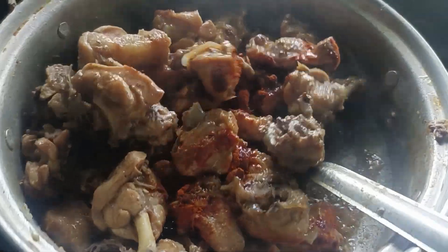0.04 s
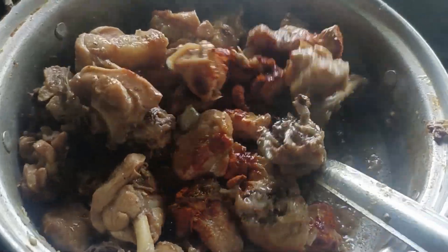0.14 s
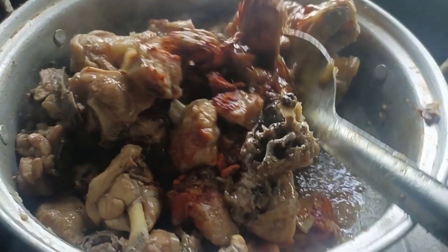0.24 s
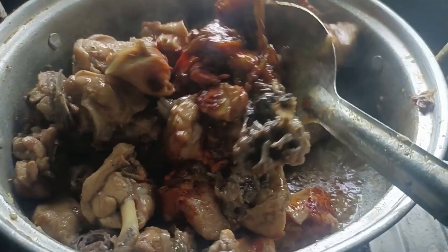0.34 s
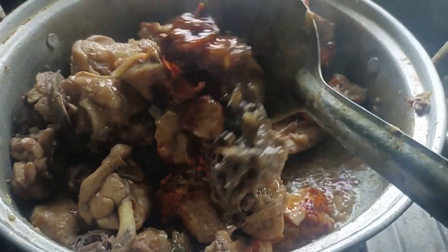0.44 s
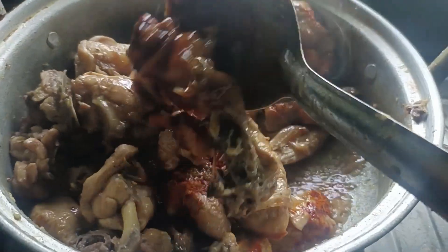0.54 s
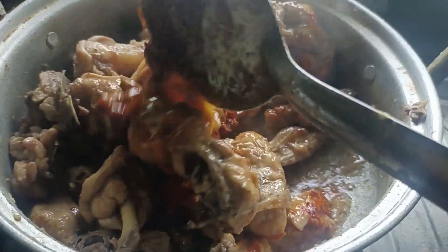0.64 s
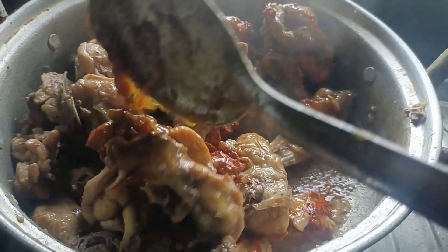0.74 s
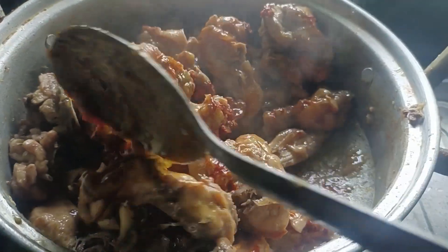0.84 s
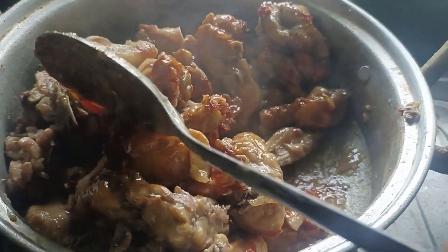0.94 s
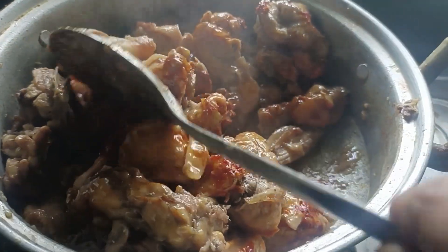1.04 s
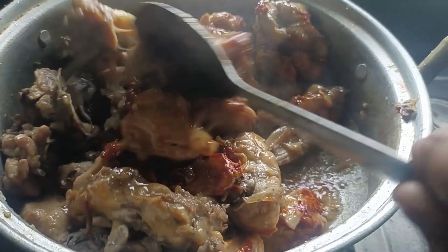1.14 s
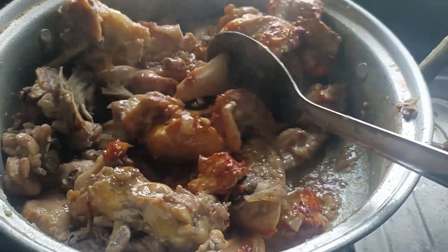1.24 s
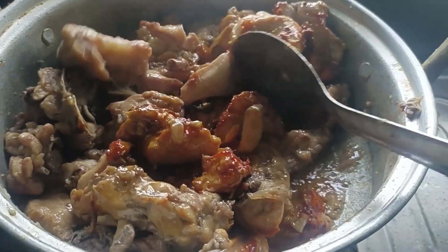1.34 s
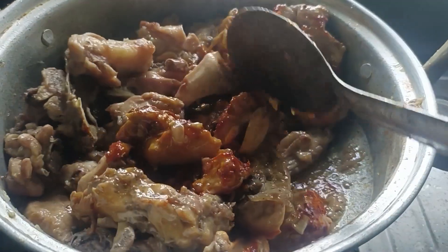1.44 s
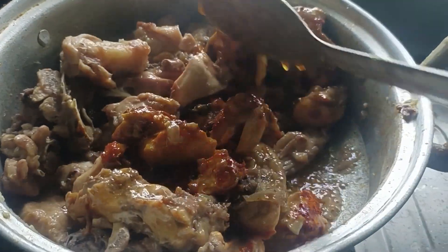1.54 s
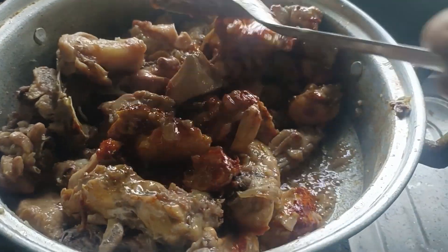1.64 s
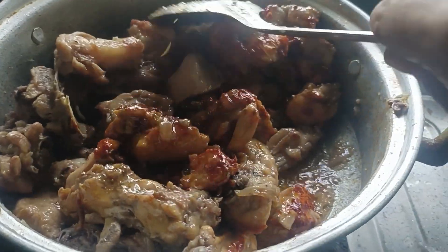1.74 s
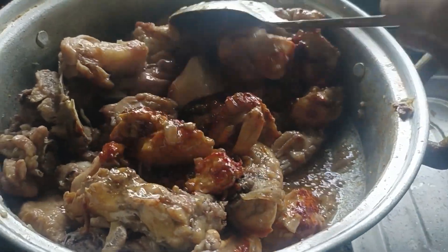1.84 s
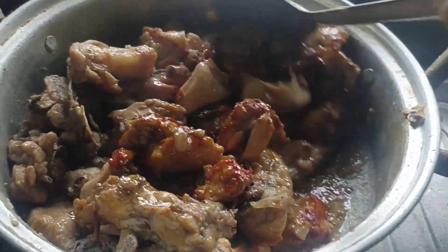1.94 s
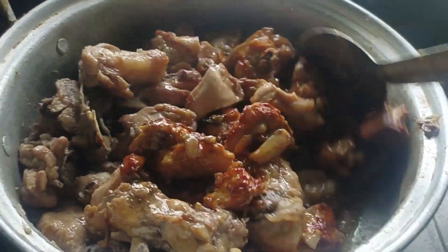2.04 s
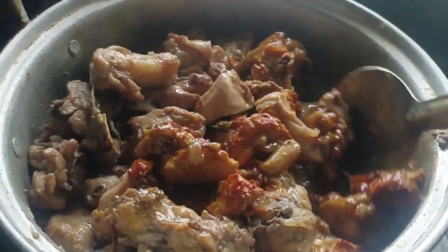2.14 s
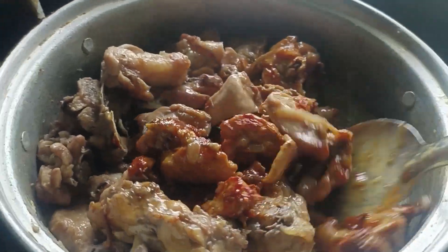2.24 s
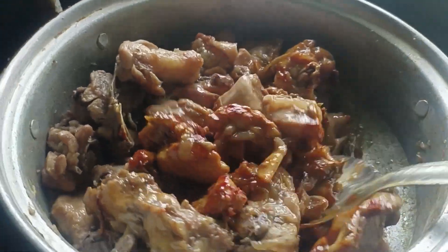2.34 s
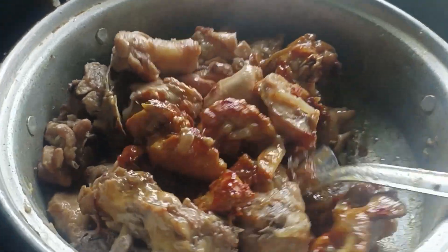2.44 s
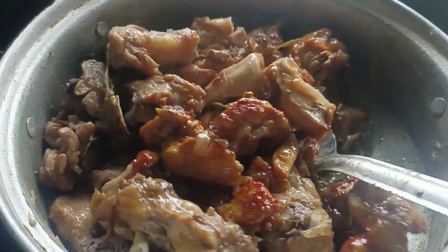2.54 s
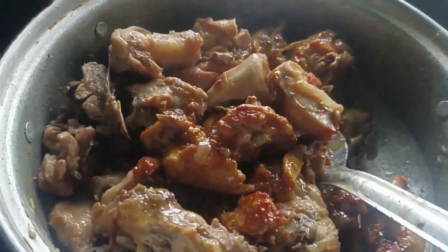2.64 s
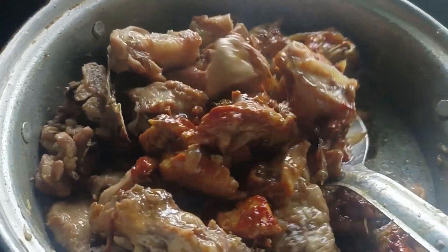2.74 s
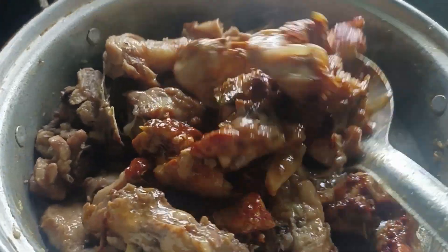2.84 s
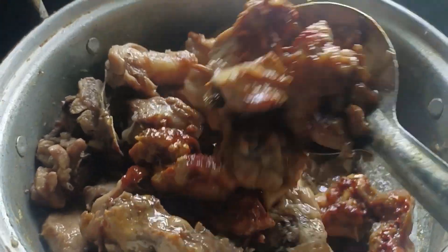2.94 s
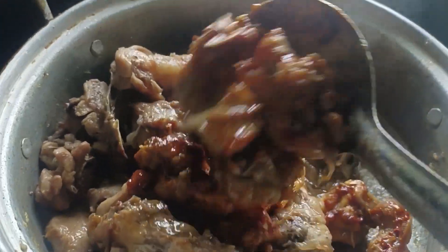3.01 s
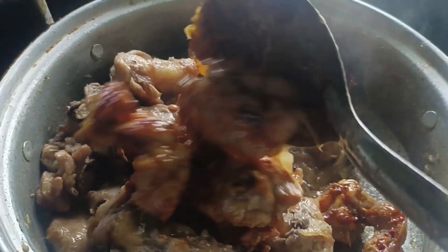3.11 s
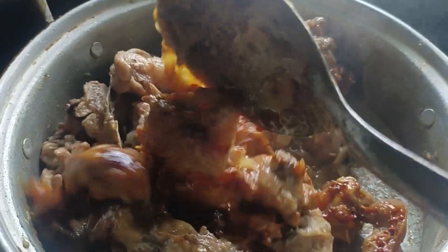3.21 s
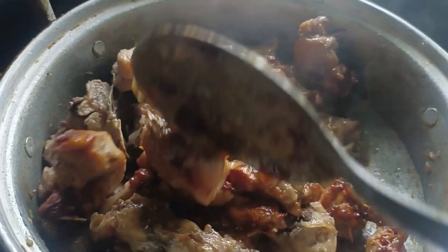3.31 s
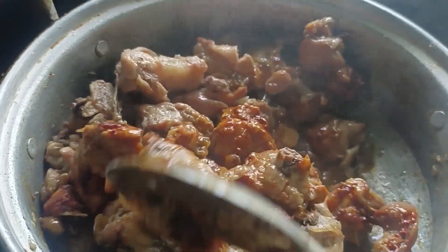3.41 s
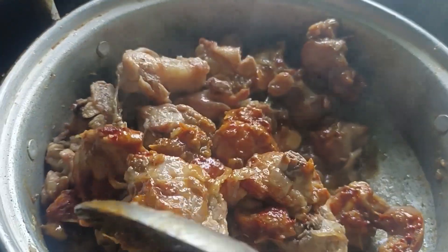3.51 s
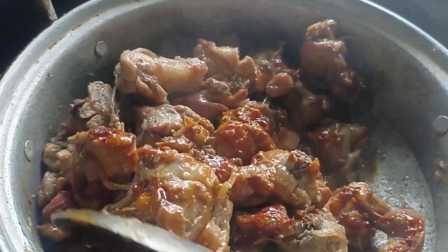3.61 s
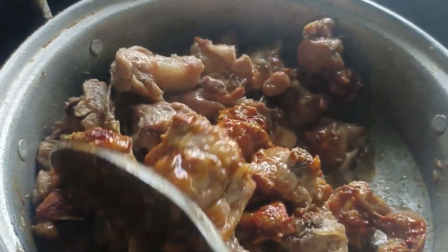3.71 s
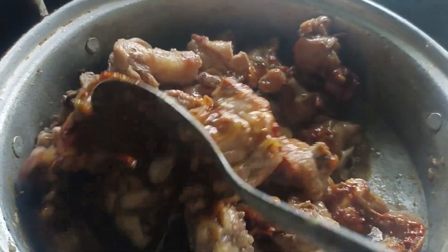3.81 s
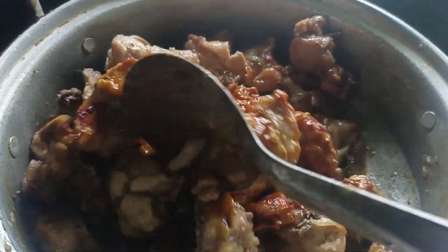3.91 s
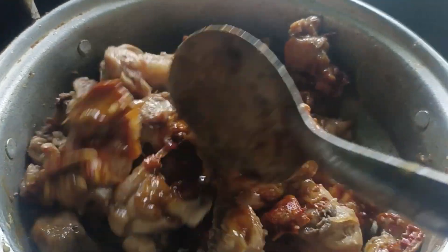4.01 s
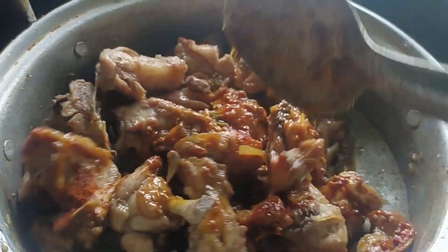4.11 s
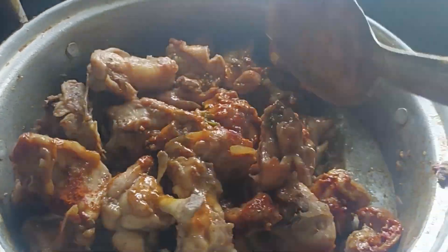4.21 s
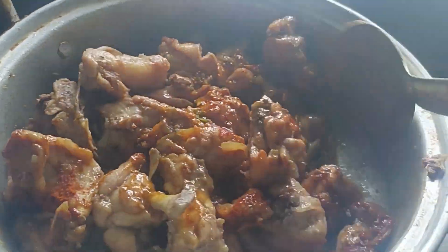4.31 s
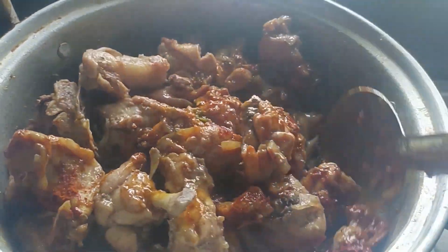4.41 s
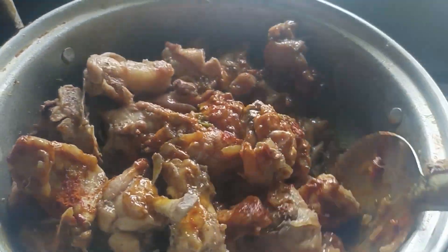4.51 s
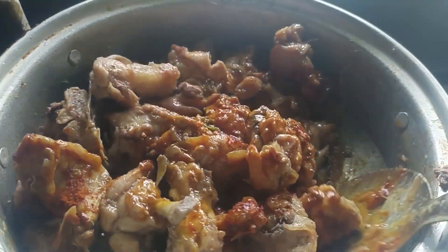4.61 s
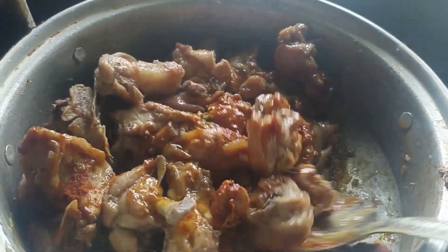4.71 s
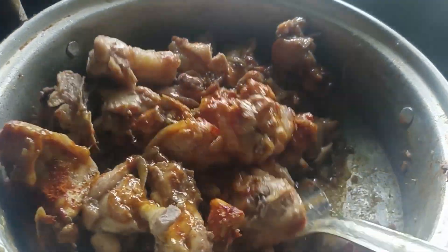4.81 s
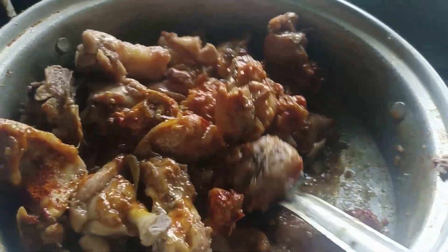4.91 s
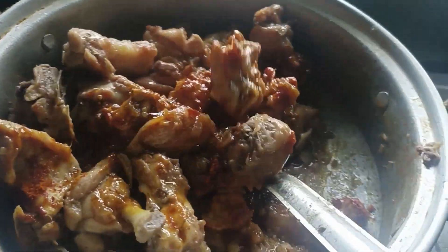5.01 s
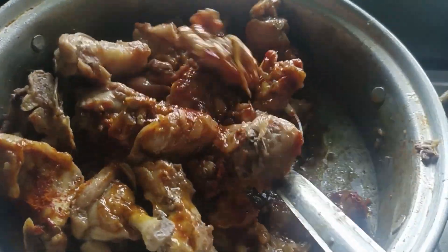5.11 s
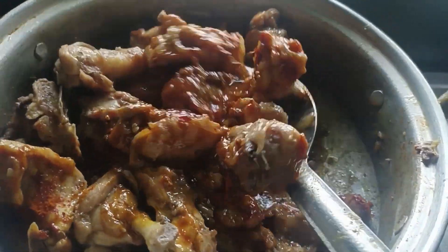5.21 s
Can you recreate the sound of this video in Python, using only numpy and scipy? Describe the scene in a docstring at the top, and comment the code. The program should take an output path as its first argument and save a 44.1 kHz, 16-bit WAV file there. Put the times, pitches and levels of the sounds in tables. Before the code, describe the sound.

Sauce sizzles softly in a wide metal pot throughout, close by in a small kitchen, over a faint low stove rumble. In the first half second a metal spoon knocks the bottom about three times with low, ringing booms, along with clinks and a short scrape. The frying then flares up, strongest around 1.5 seconds. From about 1.9 to 2.9 seconds the spoon drags along the wall with gritty scrapes, clinks, thin high squeaks and faint brief whistles, while chunks of meat tumble with soft thuds. A booming knock lands at 3 seconds, followed by mostly sizzling, which swells again near 3.9 seconds. At 4.3 seconds comes a sharp clink with a faint deep thump, then more scraping, squeaking, light clinks and dull thuds of meat. One last ringing knock on the pot comes at about 5.2 seconds.

```python
"""A small kitchen: a metal spoon turns chunks of meat in a wide metal pot on a stove.
Sauce sizzles in tiny bursts over a low rumble and flares up as wet meat meets hot metal.
Pieces tumble back with soft thuds; there is one deep handling thump, and faint whistles glide by.
The spoon's edge sticks and slips on the wall in scrapes and squeaks, clinks against it,
and knocks the pot bottom into a low boom."""
import sys
import numpy as np
from scipy import signal
from scipy.fft import rfft, irfft, next_fast_len
from scipy.io import wavfile

SR = 44100
rng = np.random.default_rng(int(sys.argv[2]) if len(sys.argv) > 2 else 0)


def pcm_store(signal):
    """Save signal as 16-bit PCM."""
    levels = np.round(np.clip(np.atleast_2d(signal), -1, 1) * 32767)
    wavfile.write(sys.argv[1], SR, levels.astype(np.int16).T)


N = 231766
T = np.arange(N) / SR
AFTER = T[:SR * 3 // 4]   # seconds since a contact


def from_db(db):
    """Decibels to gain."""
    return 10 ** (np.asarray(db) / 20)


def unit_rms(x):
    """Scale to rms 1."""
    return x / np.sqrt(np.mean(x ** 2) + 1e-20)


def at_hz(points, hz):
    """Read a table on a log-frequency axis."""
    points_hz, values = np.transpose(points)
    return np.interp(np.log(np.maximum(hz, 1)), np.log(points_hz), values)


def add(out, start_s, sound):
    """Mix a sound in at a time."""
    start = max(round(start_s * SR), 0)
    part = sound[..., :N - start]
    out[..., start:start + part.shape[-1]] += part


def colour(x, spectrum):
    """Minimum-phase filter through (Hz, dB) points."""
    length = x.shape[-1]
    size = 2 * next_fast_len(length // 2 + 4096)
    bins_hz = np.arange(size // 2 + 1) * SR / size
    cepstrum = irfft(np.log(from_db(at_hz(spectrum, bins_hz))))
    cepstrum[1:size // 2] *= 2
    cepstrum[size // 2 + 1:] = 0
    return irfft(rfft(x, size) * np.exp(rfft(cepstrum)))[..., :length]


def tilted(spectrum, db_per_octave):
    """Tilt a spectrum about 700 Hz: harder contacts are brighter."""
    return [(hz, db + db_per_octave * np.log2(hz / 700)) for hz, db in spectrum]


def resonate(x, hz, width_hz):
    """Two-pole resonance."""
    r = np.exp(-np.pi * width_hz / SR)
    return signal.lfilter([1 - r, 0, r - 1], [1, -2 * r * np.cos(2 * np.pi * hz / SR), r * r], x)


def swell(rise_s, t60_s):
    """Envelope that builds up and dies away."""
    return (1 - np.exp(-AFTER / max(rise_s, 1e-4))) * from_db(-60 * AFTER / t60_s)


def drift(rate_hz):
    """Random wander of rms 1."""
    knots = rng.standard_normal(1024)
    return unit_rms(np.interp(T * rate_hz, np.arange(len(knots)), knots))


def grains(per_s, spread_db):
    """Random impulses of uneven size, each reaching the two sides differently."""
    sizes = from_db(spread_db * np.minimum(rng.exponential(1, N), 4))
    fired = rng.random(N) < per_s / SR
    return unit_rms(fired * sizes * rng.standard_normal((2, N)))


# Stereo width. Each row: frequency in Hz, side over mid in dB.
STEREO_WIDTH = [(60, -14), (130, -13), (260, -26.5), (500, -11.5), (1000, 0), (2000, -1), (5000, 0)]

def diffuse(size):
    """Stereo noise: alike in the bass, unrelated in the treble."""
    mid, side = rng.standard_normal((2, size))
    return mid + colour(side, STEREO_WIDTH) * [[1], [-1]]


# Stove rumble. Each row: frequency in Hz, relative level in dB.
RUMBLE_SPECTRUM = [(25, -15), (55, -54), (70, -32), (82, 10.5), (110, -9), (160, -2), (230, 5), (330, -5),
                   (550, -9), (1000, -11), (2000, -29)]

def stove(level_db=-63):
    """A steady low rumble under the pot."""
    return from_db(level_db) * unit_rms(colour(diffuse(N), RUMBLE_SPECTRUM))


# Whistles and groans. Each row: start in seconds, length in seconds, first and last pitch in Hz,
# level in dB.
WHISTLE_GLIDES = [(0.978, 0.25, 780, 768, -56), (1.949, 0.096, 3020, 2780, -42.5),
                  (2.138, 0.106, 504, 395, -45), (2.404, 0.16, 708, 707, -36.5),
                  (2.655, 0.18, 737, 684, -56), (2.744, 0.0465, 4230, 3810, -47),
                  (2.792, 0.104, 1870, 1890, -50), (3.254, 0.051, 4650, 4420, -49.5),
                  (3.52, 0.053, 4180, 3640, -49.5), (5.053, 0.065, 1098, 1037, -43.5)]

def whistles(roughness=0.9, flutter_cycles=7):
    """Faint tones glide in and out, roughened by a flutter in level and phase."""
    out = np.zeros((2, N))
    for start_s, length_s, first_hz, last_hz, db in WHISTLE_GLIDES:
        size = int(length_s * SR)
        phase = 2 * np.pi * np.cumsum(np.linspace(first_hz, last_hz, size)) / SR
        flutter_hz = first_hz / flutter_cycles
        tone = np.zeros((2, size))
        for side in range(2):
            steady = (1 - roughness) * np.exp(2j * np.pi * rng.random())
            flutter = roughness * (drift(flutter_hz) + 1j * drift(flutter_hz))[:size]
            tone[side] = np.real((steady + flutter) * np.exp(1j * phase))
        add(out, start_s, from_db(db) * np.sqrt(np.hanning(size)) * unit_rms(tone))
    return out


# Meat lands wet side down. Each row: start in seconds, length in seconds, peak fizz in dB,
# midway pitch in Hz.
FRYING_FLARES = [(0.43, 1, -48.5, 3540), (1.06, 1, -42, 3610), (1.869, 0.51, -40, 3270),
                 (2.996, 0.24, -47.5, 3270), (3.62, 0.59, -44.5, 3200), (4.403, 0.84, -46.5, 3440)]

def flares(sink_octaves_per_s=0.18):
    """Power and pitch in Hz of the fizz: each flare swells and fades, sinking as its bubbles grow."""
    power, weighted_hz = np.full(N, 1e-12), np.full(N, 1e-9)
    for start_s, length_s, db, hz in FRYING_FLARES:
        progress = np.clip((T - start_s) / length_s, 0, 1)
        flare = (from_db(db) * np.sin(np.pi * progress)) ** 2
        power += flare
        weighted_hz += flare * hz * 2 ** (-sink_octaves_per_s * (T - start_s - length_s / 2))
    return power, weighted_hz / power


# Frying hiss. Each row: frequency in Hz, relative level in dB.
HISS_SPECTRUM = [(300, -36), (800, -41), (1300, -3.5), (2000, -5.5), (2800, -2), (3700, 4.5), (4700, 4),
                 (6000, 6), (7000, -3.5), (8500, -2.5), (9300, -14), (11000, -13.5), (14500, -4),
                 (16000, -11)]
# Hiss beneath the flares. Each row: time in seconds, level in dB.
HISS_FLOOR = [(0, -46.5), (0.85, -48), (1.2, -47), (1.45, -55), (1.8, -49), (2.7, -47), (3.35, -51),
              (3.95, -47), (4.27, -50), (4.6, -47), (5.26, -46.5)]
# Resonances of the pot's hollow. Each row: frequency in Hz, width in Hz, gain in dB.
HOLLOW_MODES = [(2760, 86, -5.5), (3720, 133, -4.5)]

def sizzle(spread_octaves=0.32, flicker_db=3.5, surge_db=1.0, flare_hiss_db=-9.5):
    """Tiny bursts hiss; larger bubbles ring in wavering clusters as wet meat meets hot metal."""
    flare_power, centre_hz = flares()
    floor = from_db(np.interp(T, *np.transpose(HISS_FLOOR)))
    hiss_gain = np.sqrt(floor ** 2 + from_db(flare_hiss_db) ** 2 * flare_power)
    hiss = unit_rms(colour(grains(per_s=5900, spread_db=5) + diffuse(N), HISS_SPECTRUM))
    # neighbouring bubble sizes burst independently
    bursts = [grains(per_s=8000, spread_db=2.5) for _ in range(2)]
    fizz, fizz_power = 0, 1e-12
    for k, hz in enumerate(np.geomspace(1900, 5600, 26)):
        share = np.exp(-0.5 * (np.log2(hz / centre_hz) / spread_octaves) ** 2)
        ringing = resonate(resonate(bursts[k % 2], hz, hz / 25), hz, hz / 10)
        flicker = from_db(flicker_db * drift(rate_hz=25))
        fizz += share * unit_rms(flicker * ringing)
        fizz_power += share ** 2
    surge = from_db(surge_db * drift(rate_hz=23.78))
    frying = surge * (hiss_gain * hiss + np.sqrt(flare_power / fizz_power) * fizz)
    return frying + sum(from_db(db) * resonate(frying, hz, width) for hz, width, db in HOLLOW_MODES)


# Modes of the pot bottom. Each row: frequency in Hz, relative level in dB, t60 in seconds.
BOTTOM_MODES = [(86.1, -23.5, 0.6), (112.1, -23, 0.55), (130.5, -15, 0.41), (205.6, -17, 0.45),
                (242.5, 0, 0.55), (323, -1, 0.36), (395, -10.5, 0.28), (482, -19, 0.091), (527, -31, 0.33),
                (545, -20.5, 0.32), (666, -12.5, 0.41), (797, -11.5, 0.38), (930, -22, 0.43),
                (1186, -11.5, 0.34), (1490, -9, 0.24)]

def boom(rise_s, damping, spread_db, dull_db_per_octave, main_hz=242.5):
    """The bottom rings with new mode strengths each time; soft contacts wake mainly the strongest."""
    out = 0
    for k, (hz, db, t60_s) in enumerate(BOTTOM_MODES):
        dulling_db = dull_db_per_octave * abs(np.log2(hz / main_hz))
        gain = from_db(db + spread_db * rng.standard_normal() - dulling_db)
        out += (-1) ** k * gain * np.sin(2 * np.pi * hz * AFTER) * swell(rise_s, t60_s / damping)
    return out


# Soft thuds: meat falls or is pushed against the pot, plus one faint, deep handling thump.
# Each row: start in seconds, boom in dB, thud in dB, thud pitch in Hz, rise in seconds.
SOFT_THUDS = [(2.046, -32.5, -37.5, 394, 0.025), (2.104, -36, -32, 490, 0.0032),
              (2.274, -41, -42.5, 290, 0.02), (2.427, -26, -36.5, 610, 0.0078),
              (2.446, -26.5, -27, 620, 0.0025), (2.591, -27, -37.5, 525, 0.0095),
              (2.633, -31, -44, 325, 0.003), (2.765, -39.5, -58, 394, 0.0063),
              (2.876, -26, -24, 557, 0.0013), (3.106, -30, -35, 368, 0.0024), (3.841, -52, -34, 444, 0.019),
              (4.377, -54, -48, 62, 0.008), (4.49, -32.5, -40.5, 398, 0.0092),
              (4.573, -29.5, -33.5, 450, 0.012), (4.621, -29, -36, 423, 0.0046),
              (4.852, -33.5, -29.5, 684, 0.0099), (4.949, -38.5, -49.5, 454, 0.0048),
              (5.092, -25.5, -34.5, 436, 0.017)]

def thuds():
    """A soft contact gives a dull thud and damps the bottom that it sets booming."""
    out = np.zeros((2, N))
    for start_s, boom_db, thud_db, hz, rise_s in SOFT_THUDS:
        spectrum = [(hz / 10, -30), (hz / 3, -17), (hz / 2, -6), (hz, 0),
                    (hz * 1.21, -6), (hz * 2.32, -21), (hz * 8, -45), (hz * 20, -70)]
        thud = unit_rms(colour(diffuse(len(AFTER)), spectrum)) * swell(rise_s, t60_s=0.29)
        bottom = boom(rise_s, damping=1.85, spread_db=3, dull_db_per_octave=16)
        add(out, start_s, from_db(thud_db) * thud + from_db(boom_db) * bottom)
    return out


def pressure(start_s, length_s, bite_s, ease_db_per_s=27, lift_db_per_s=233):
    """How hard the spoon drags: it bites, the hand eases off, then lifts it."""
    since_s = np.maximum(T - start_s, 0)
    fall_db = ease_db_per_s * since_s + lift_db_per_s * np.maximum(since_s - length_s, 0)
    return from_db(-fall_db) * np.minimum(since_s / bite_s, 1) ** 2


# Resonances of the pot wall. Each row: frequency in Hz, width in Hz, relative level in dB.
WALL_MODES = [(870, 48, -12), (999, 70, -6.5), (1237, 90, -0.5), (1310, 38, -9), (1647, 19, -7.5),
              (2070, 72, -2.5), (2446, 21, -8.5), (2820, 240, -11), (3790, 59, -4.5), (5540, 300, 1.5)]
# Grit of a scrape. Each row: frequency in Hz, relative level in dB.
GRIT_SPECTRUM = [(100, -18), (450, 5), (800, -5), (1300, 2), (2200, 5.5), (3800, 10), (4800, 4.5),
                 (5900, -1.5), (7000, -17), (8500, -4.5), (10700, -29), (13000, -10), (15200, 2),
                 (16500, -71)]
# Spoon drags. Each row: start in seconds, length in seconds, level in dB, bite time in seconds,
# favoured pitch in Hz.
SPOON_DRAGS = [(0.256, 0.089, -35.5, 0.0045, 3200), (1.192, 0.045, -47.5, 0.031, 1860),
               (1.933, 0.23, -35, 0.13, 2870), (2.147, 0.013, -31, 0.022, 4750),
               (2.214, 0.11, -42, 0.048, 2530), (2.324, 0.17, -41.5, 0.041, 1800),
               (2.45, 0.32, -38.5, 0.086, 1640), (2.571, 0.025, -36.5, 0.017, 1000),
               (4.003, 0.027, -50.5, 0.027, 2160), (4.392, 0.12, -34, 0.0045, 1120),
               (4.538, 0.063, -41, 0.038, 1130), (4.79, 0.18, -40.5, 0.019, 2110),
               (5.031, 0.056, -43, 0.019, 1220)]

def scrapes(ring_db=-0.5, wander_db=4, focus_db=3, catches_per_s=90, catch_db=2):
    """The edge catches and slips, waking the wall's resonances; the contact point favours one pitch."""
    slips = grains(per_s=7000, spread_db=2) * from_db(catch_db * drift(catches_per_s))
    rings = 0
    for hz, width_hz, db in WALL_MODES:
        gain = from_db(db + wander_db * drift(rate_hz=22))
        rings += gain * unit_rms(resonate(slips, hz, width_hz))
    rub = unit_rms(colour(slips, GRIT_SPECTRUM)) + from_db(ring_db) * unit_rms(rings)
    out = np.zeros((2, N))
    for start_s, length_s, db, bite_s, hz in SPOON_DRAGS:
        voiced = unit_rms(rub + from_db(focus_db) * resonate(rub, hz, hz / 4))
        out += from_db(db) * pressure(start_s, length_s, bite_s) * voiced
    return out


# Thin high rings of the spoon. Each row: frequency in Hz, width in Hz, relative level in dB.
SPOON_MODES = [(8660, 120, -5.5), (9560, 87, -13), (12500, 220, -6), (14050, 160, 0), (14450, 200, -1),
               (15270, 160, 8.5)]
# The edge sticks. Each row: start in seconds, level in dB, t60 in seconds.
SPOON_SQUEAKS = [(.145, -46, 0.46), (.6, -45, 0.11), (.81, -45, .06), (1.681, -35.5, 0.047),
                 (1.839, -39.5, 0.3), (2.04, -42, 0.11), (2.338, -32.5, 0.13), (2.381, -30, 0.46),
                 (2.826, -41.5, 0.35), (3.147, -36, 0.1), (4.321, -31, 0.2), (4.376, -37, 0.49),
                 (4.6, -41, 0.24), (4.699, -37, 0.32)]

def squeaks():
    """Bursts of stick-slip feed the high rings of the spoon."""
    rubbing = np.zeros((2, N))
    for start_s, db, t60_s in SPOON_SQUEAKS:
        add(rubbing, start_s, from_db(db) * swell(0.0006, t60_s))
    rings = 0
    for hz, width_hz, db in SPOON_MODES:
        band = resonate(diffuse(N), hz, width_hz)
        rings += from_db(db) * unit_rms(resonate(band, hz, 5 * width_hz))
    return rubbing * unit_rms(rings)


# Crack of steel on the wall. Each row: frequency in Hz, relative level in dB.
CRACK_SPECTRUM = [(150, -24), (300, 0.5), (1100, 4), (1750, 4.5), (2080, 0.5), (2400, 10.5), (4600, 3),
                  (5500, 1.5), (6900, 1.5), (8000, 0), (11000, -15.5), (12900, 2.5), (14000, -28),
                  (15500, -21)]
# The edge hits the wall. Each row: start in seconds, relative crack level in dB, tilt in dB per octave,
# left over right in dB, note in Hz, note level in dB.
SPOON_CLINKS = [(0.249, -21, -3.5, -0.5, 980, -21), (0.5058, -25.5, -3.5, -2, 1260, -33),
                (0.5532, -26, -14.5, 7, 1700, -35), (2.0861, -23.5, -2.5, -4.5, 1298, -12.5),
                (2.337, -54, 18, -13, 12100, -43), (2.445, -25.5, -8, 0, 716, -25),
                (2.468, -21.5, -1, -1.5, 1400, -47), (2.5874, -35, 4, -9, 1890, -31),
                (2.635, -37, 0.5, -5, 1900, -35), (3.0017, -29.5, -2.5, -6, 1086, -30),
                (4.3343, -15, 3, 2, 2066, -16.5), (4.3945, -31, -7.5, 0, 2040, -36),
                (4.496, -30.5, -5, 6, 3840, -25), (4.728, -26.5, -2, -2, 2420, -25),
                (4.7981, -30.5, 1.5, 2, 2260, -26), (5.234, -26.5, -2, -1, 1130, -28)]

def clinks(crack_trim_db=-4, room_db=-21, wall_db=5):
    """Steel on the wall: a crack, a brief note set by the contact point, and the kitchen's answer."""
    crack_envelope = swell(0.0011, t60_s=0.0092) + from_db(room_db) * swell(0.0019, t60_s=0.2)
    note_envelope = swell(0.0003, t60_s=0.028) + from_db(room_db) * swell(0.003, t60_s=0.16)
    out = np.zeros((2, N))
    for start_s, crack_db, tilt, side_db, note_hz, note_db in SPOON_CLINKS:
        burst = rng.standard_normal((2, len(AFTER))) * crack_envelope
        crack = colour(burst, tilted(CRACK_SPECTRUM, tilt))
        wall = sum(from_db(db) * resonate(crack, hz, width) for hz, width, db in WALL_MODES)
        crack += from_db(wall_db) * wall
        crack /= np.std(crack[:, :SR // 200])   # level set by the first 5 ms
        note = np.sin(2 * np.pi * (note_hz * AFTER + rng.random((2, 1)))) * note_envelope
        pan = from_db([[side_db / 2], [-side_db / 2]])
        add(out, start_s, pan * (from_db(crack_db + crack_trim_db) * crack + from_db(note_db) * note))
    return out


# Dense ring of the wall. Each row: frequency in Hz, relative level in dB.
RING_SPECTRUM = [(40, -51.5), (80, -24), (130, -12.5), (170, -15), (260, 1), (480, -3), (750, -6),
                 (1100, -10.5), (2000, -12.5), (3200, -18), (6000, -32.5), (10000, -53.5), (16000, -35)]
# Its decay. Each row: frequency in Hz, t60 in seconds.
RING_DECAY = [(100, 0.68), (300, 0.31), (1000, 0.35), (3000, 0.18), (8000, 0.88), (16000, 0.11)]

def wall_ring(tilt, rise_s):
    """Crowded modes of wall and kitchen, each octave dying at its own rate."""
    noise = unit_rms(colour(diffuse(len(AFTER)), tilted(RING_SPECTRUM, tilt)))
    out = 0
    for hz in 125 * 2 ** np.arange(8):
        lowpass = signal.butter(2, min(hz * np.sqrt(2), 0.45 * SR), fs=SR, output="sos")
        band = signal.sosfiltfilt(lowpass, noise)
        out += band * swell(rise_s, at_hz(RING_DECAY, hz))
        noise -= band
    return out


# Spoon on the pot bottom. Each row: start in seconds, boom in dB, wall ring in dB,
# ring tilt in dB per octave, rise in seconds.
SPOON_KNOCKS = [(.004, -20, -20.5, -1, 0.00031), (.25, -22.5, -21.5, 0, 0.0072),
                (0.295, -36.5, -21, -1, 0.003), (.510, -21, -17, -2, 0.0087),
                (2.085, -52, -27, 2.2, 0.00054), (2.467, -41.5, -28, 4.5, 0.00054),
                (3.002, -27, -39, -5.5, 0.0019), (3.012, -20.5, -21, -1.5, 0.005),
                (4.334, -40, -34, 0, 0.00063), (5.236, -24, -32.5, 4, 0.0068)]

def knocks():
    """The spoon hits the bottom: a low boom under a dense ring."""
    out = np.zeros((2, N))
    for start_s, boom_db, ring_db, tilt, rise_s in SPOON_KNOCKS:
        bottom = boom(rise_s, damping=1, spread_db=1.5, dull_db_per_octave=0)
        add(out, start_s, from_db(boom_db) * bottom + from_db(ring_db) * wall_ring(tilt, rise_s))
    return out


def scene():
    """Spoon, meat and pot over the frying."""
    return knocks() + thuds() + clinks() + squeaks() + scrapes() + sizzle() + whistles() + stove()


# Colour of the two microphone ports. Each row: frequency in Hz, left over right in dB.
PORT_BALANCE = [(60, -6.5), (92, 2), (140, -4.5), (210, 0.5), (330, -2.5), (500, 1.5), (770, -3.5),
                (1170, 0.5), (1790, -2.5), (2740, 1), (4190, -2), (6410, -8.5), (9810, 11), (15000, 0.5)]

def record(dry, lag_samples=13, cutoff_hz=16100):
    """The left port is a little farther from the pot; each port has its own colour; the top is cut."""
    delayed = np.pad(dry[0], (lag_samples, 0))[:N]
    left = colour(delayed, [(hz, db / 2) for hz, db in PORT_BALANCE])
    right = colour(dry[1], [(hz, -db / 2) for hz, db in PORT_BALANCE])
    lowpass = signal.ellip(10, 0.2, 80, cutoff_hz, fs=SR, output="sos")
    return signal.sosfilt(lowpass, [left, right])


dry = scene()
out = record(dry)
pcm_store(out)
```